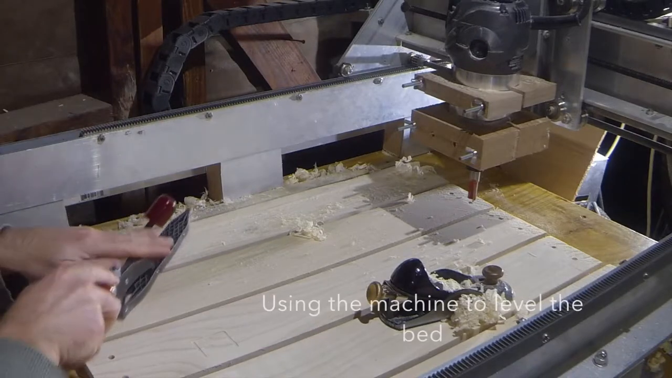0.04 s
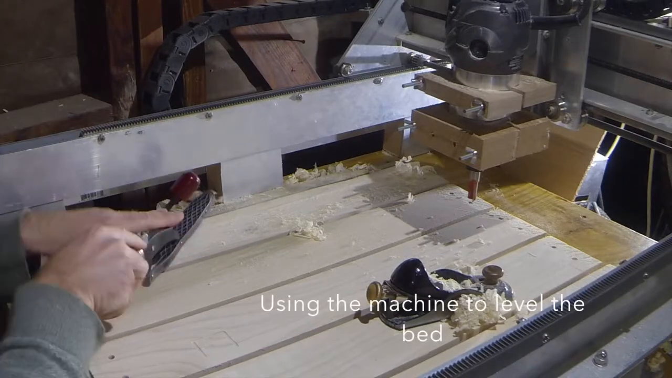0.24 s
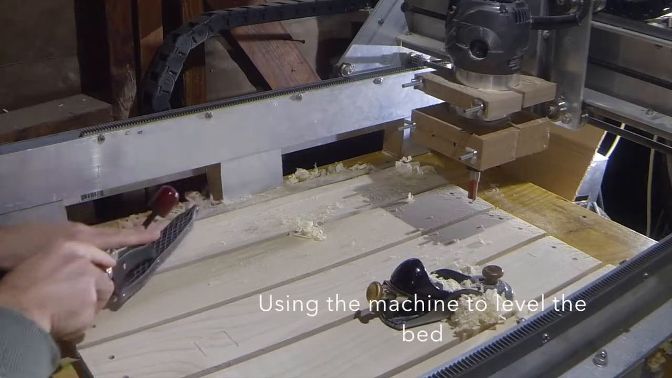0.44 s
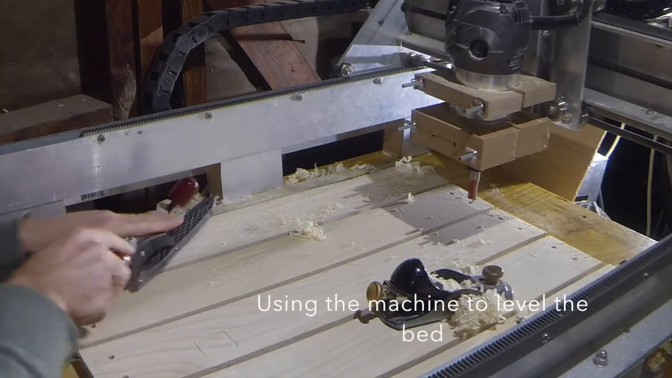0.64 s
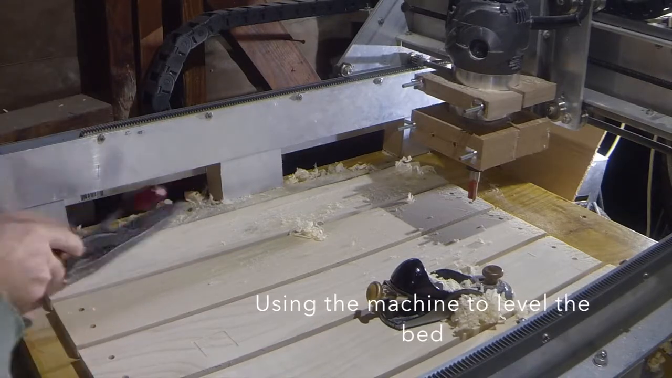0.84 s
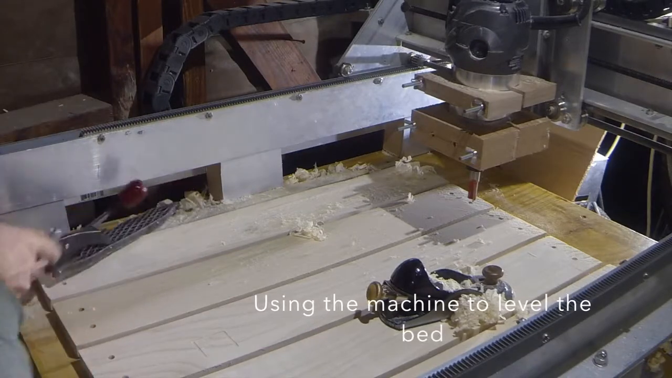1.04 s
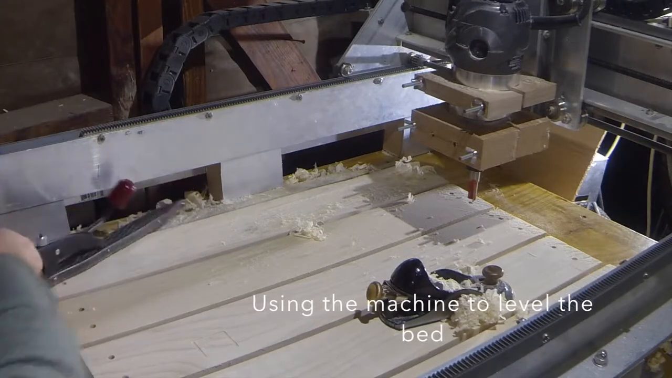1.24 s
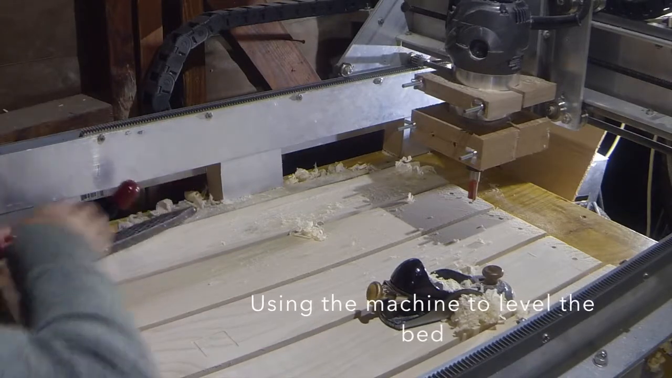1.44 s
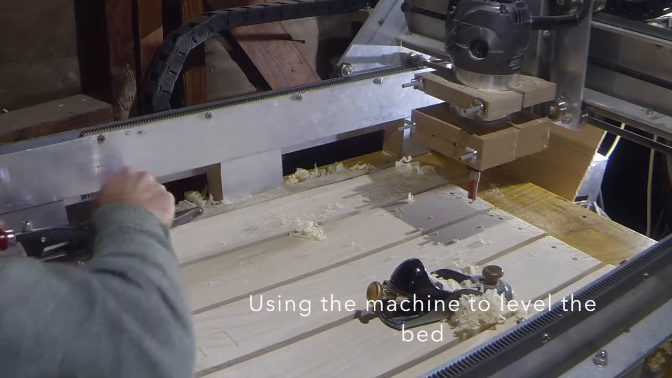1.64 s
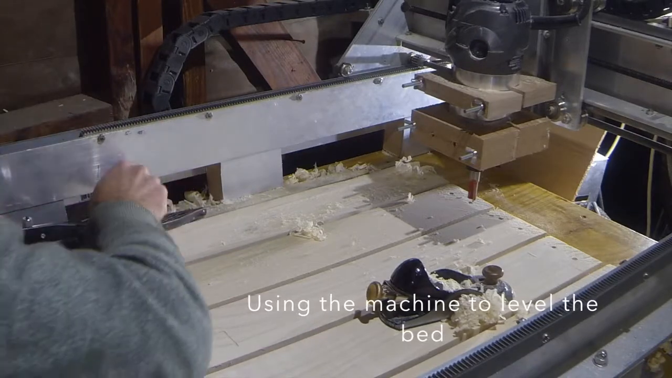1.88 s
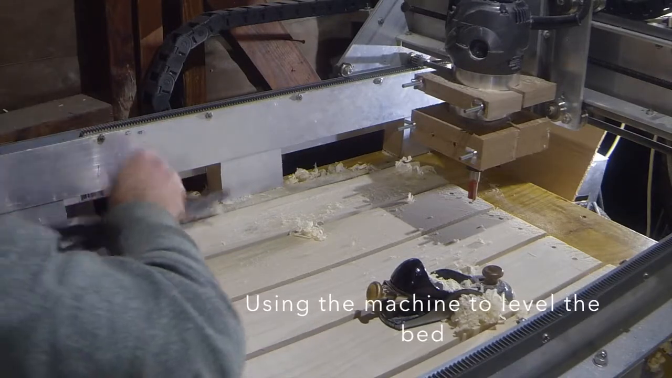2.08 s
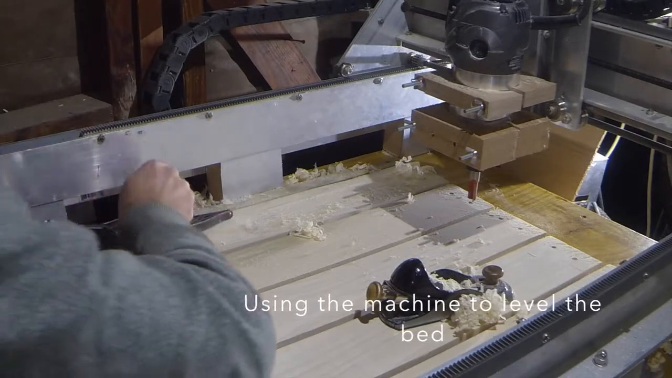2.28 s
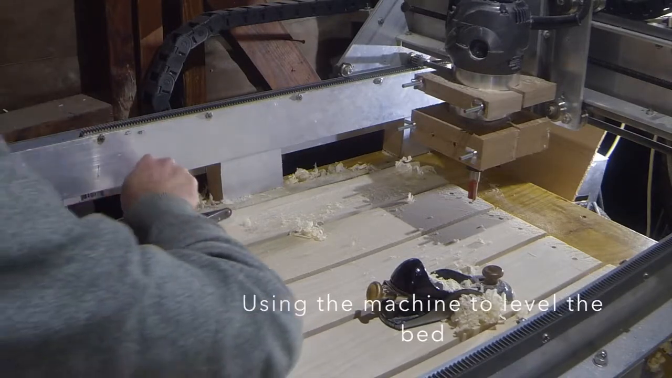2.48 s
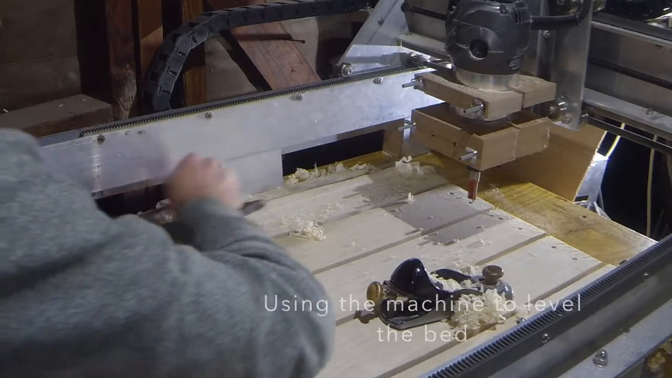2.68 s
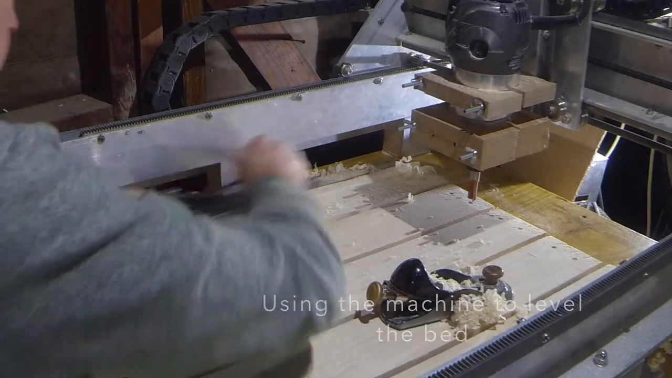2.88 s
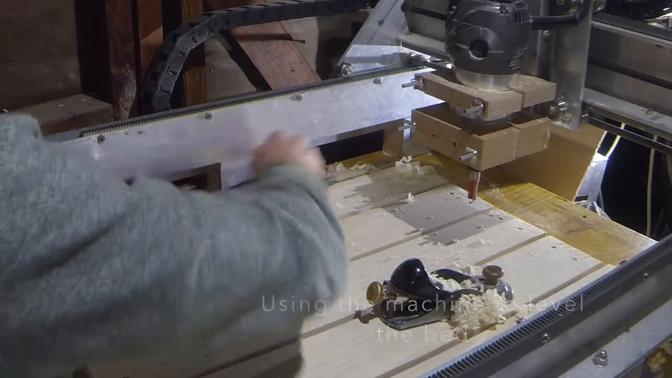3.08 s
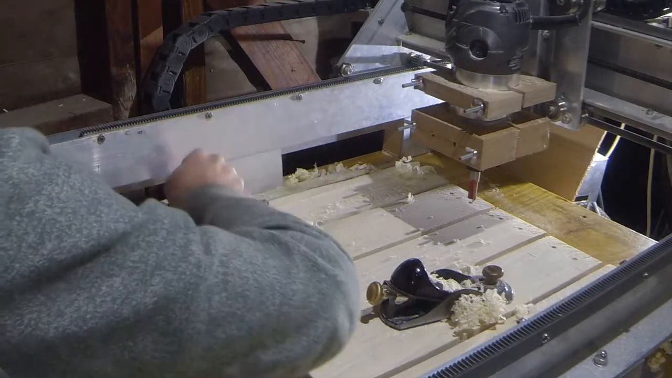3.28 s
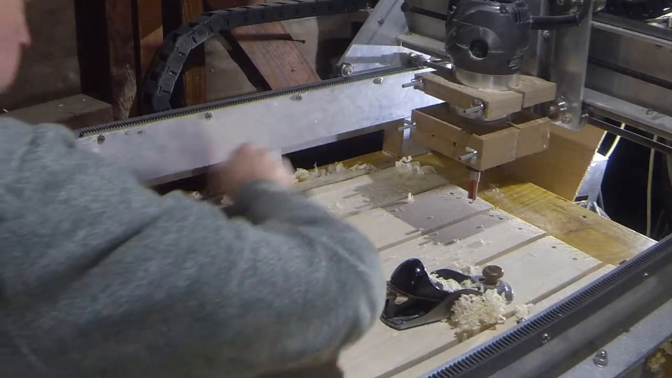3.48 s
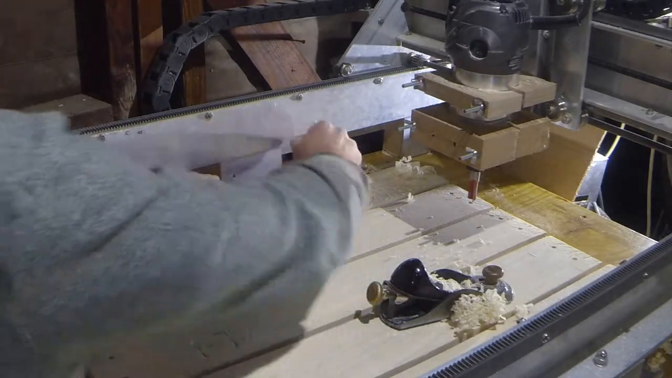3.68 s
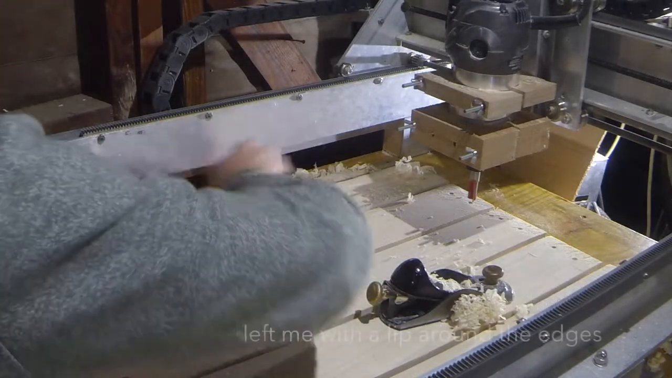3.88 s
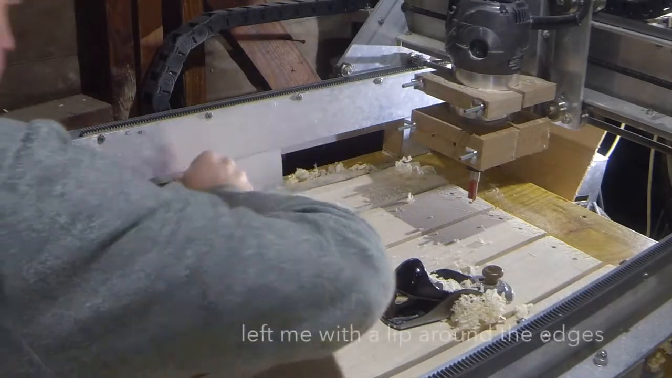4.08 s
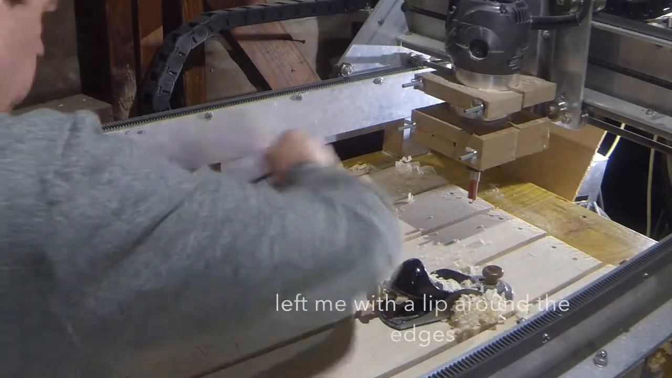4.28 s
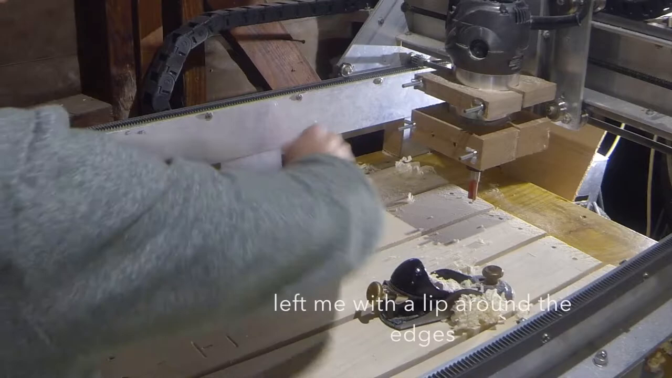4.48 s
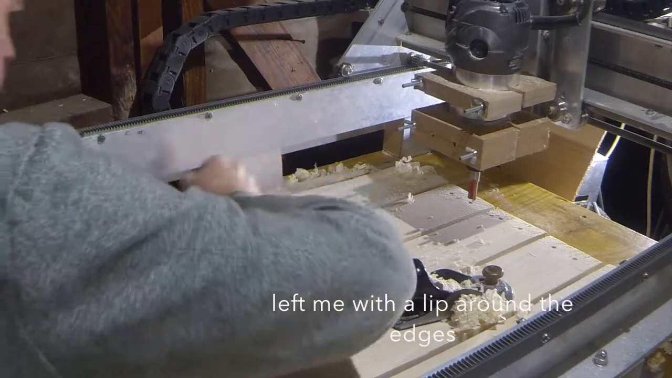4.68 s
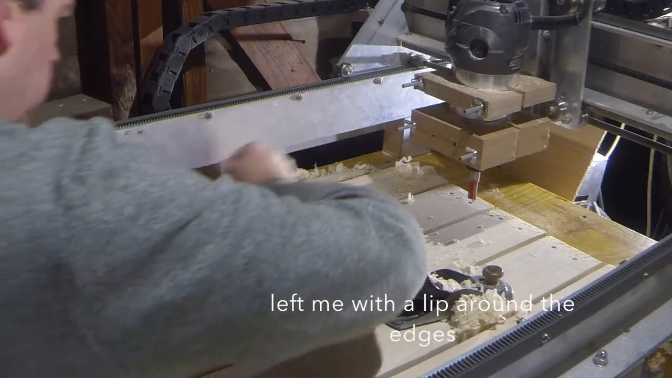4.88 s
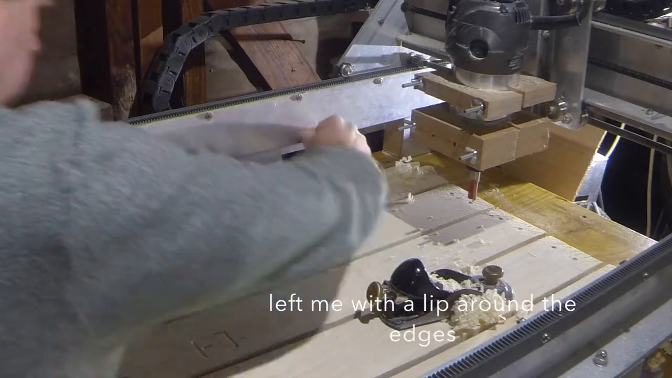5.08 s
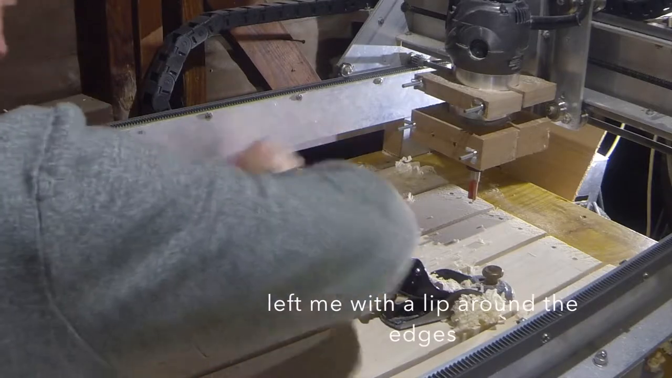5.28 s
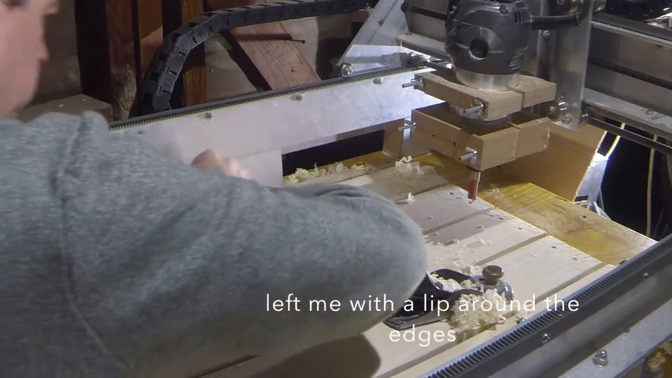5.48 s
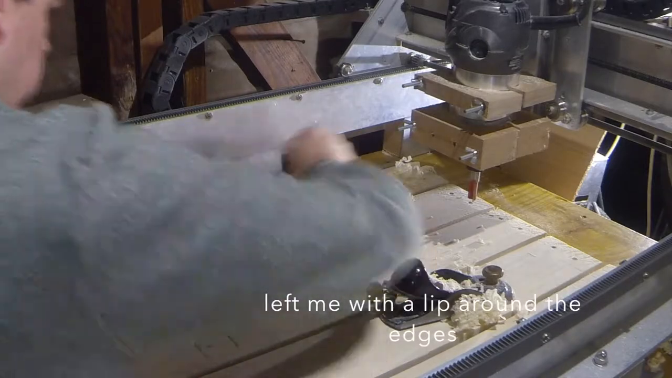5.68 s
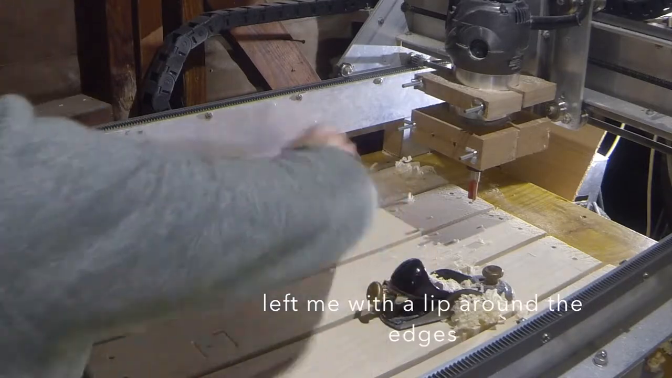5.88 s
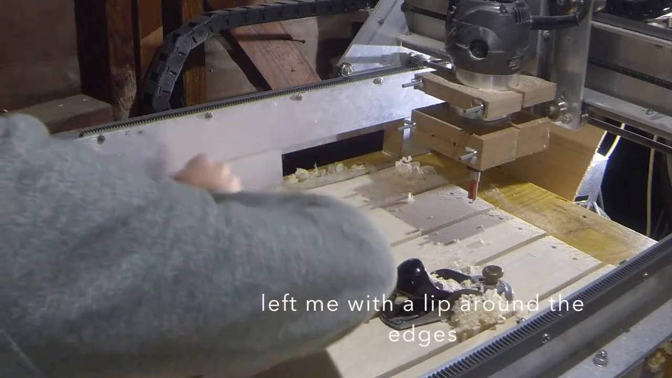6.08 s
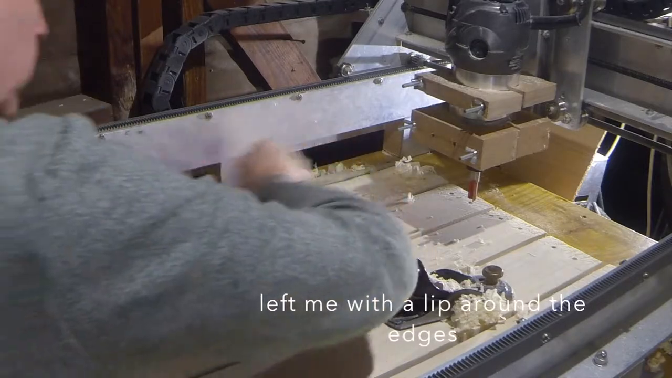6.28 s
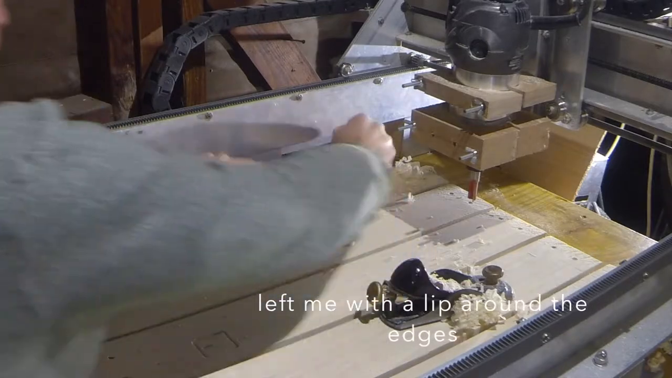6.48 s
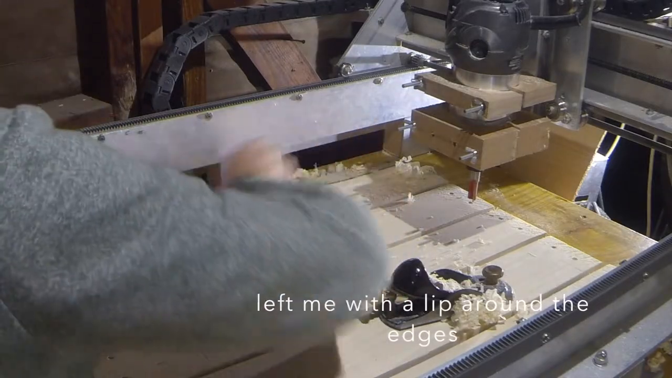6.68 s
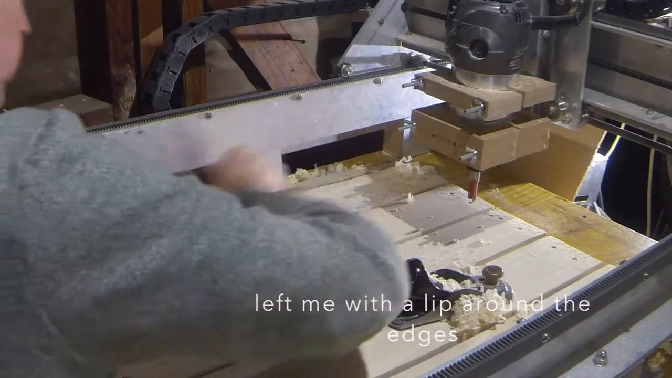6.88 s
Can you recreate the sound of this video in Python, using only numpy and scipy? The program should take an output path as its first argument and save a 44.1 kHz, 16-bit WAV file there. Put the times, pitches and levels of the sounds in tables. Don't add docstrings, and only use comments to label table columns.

```python
import sys
import numpy as np
from scipy import signal
from scipy.fft import rfft, irfft
from scipy.io import wavfile
from scipy.ndimage import uniform_filter1d

SR = 44100
rng = np.random.default_rng(int(sys.argv[2]) if len(sys.argv) > 2 else 0)


def field_ratio(decibels):
    return 10 ** (np.asarray(decibels, dtype=float) / 20)


def master(y):
    cut = np.clip(np.atleast_2d(y).T, -1, 1)
    pcm = np.round(cut * 32767)
    wavfile.write(sys.argv[1], SR, pcm.astype(np.int16))


N = 306054
HZ = np.fft.rfftfreq(N, 1 / SR)


def evened(x):
    return x / np.sqrt(np.mean(x ** 2) + 1e-20)


def read(points, hz):
    f, value = np.transpose(points)
    return np.interp(np.log(hz + 1), np.log(f + 1), value)


def coloured(points):
    spectrum = rfft(rng.standard_normal(N))
    return evened(irfft(spectrum * field_ratio(read(points, HZ)), N))


def smoothed(x, size, axis=-1):
    return uniform_filter1d(uniform_filter1d(x, size=size, axis=axis), size=size, axis=axis)


def ring(modes, sense=-1, rise_cycles=0.011):
    hz, width_hz, db = np.transpose(modes)[:, :, None]
    t = np.arange(SR // 3) / SR
    turn = sense ** np.arange(len(modes))[:, None]
    swing = (1 - np.exp(-hz * t / rise_cycles)) ** 2 * np.exp(-np.pi * width_hz * t)
    tick = (turn * field_ratio(db) * width_hz * swing * np.sin(2 * np.pi * hz * t)).sum(0)
    return tick / np.linalg.norm(tick)


# (frequency [Hz], width [Hz], level [dB])
BED_MODES = [(181, 48, -12), (269, 58, -11.5), (302, 16.4, -0.5), (365.4, 17.3, 1), (431.8, 15.3, -1.5),
             (492.7, 42, -3.5)]
BODY_MODES = [(665, 29.5, -0.07), (709, 56, -0.18), (748, 31, 1.8), (807, 43, -1.6), (923.6, 21.3, 0.71),
              (953, 42, 2), (1035, 52, 1.5), (1137, 52, 0.76), (1235, 37.5, -0.38), (1320, 36, 0.39)]
SOLE_MODES = [(1465, 86, 2), (1601, 98, 0.5), (1712, 23, -2.5), (1749, 47, -5.5), (1927, 34, -7)]
IRON_MODES = [(2114, 126, -0.5), (2497, 210, -5), (2845, 136, -2), (3033, 143, -4), (3286, 37, 0.5),
              (3440, 110, -2), (3737, 460, -6.5), (4346, 152, -6), (4560, 140, -11), (4720, 240, -13),
              (5160, 460, -17), (5750, 220, -18), (6140, 490, -21.5), (7300, 560, -23), (7370, 63, -18.5),
              (8000, 490, -30), (8560, 210, -24.5), (9100, 590, -28.5), (10260, 2900, -37),
              (12700, 1500, -57)]
HEEL_MODES = [(596, 150, -1), (827, 50, 2), (894, 147, -2)]


def strokes():
    edge_db = -15
    body, bed, iron = catches()
    torn = fibres()
    caught = [body, bed, field_ratio(-8.5) * body, iron, field_ratio(-13) * bed]
    forces = (rubbing() + caught) * torn
    objects = (BODY_MODES, BED_MODES, SOLE_MODES, IRON_MODES, HEEL_MODES)
    parts = [signal.oaconvolve(force, ring(modes))[:N] for force, modes in zip(forces, objects)]
    sharp = np.diff(ring(IRON_MODES), n=2)
    sharp = sharp / np.linalg.norm(sharp)
    return sum(parts) + signal.oaconvolve(field_ratio(edge_db) * iron * torn, sharp)[:N]


def fibres():
    fibres_per_s, spread_db = 6000, 2.5
    grip_db, chatter_db, patch_db = 1.9 - 1.3, 0.8, 1.9
    size = field_ratio(spread_db * np.minimum(rng.exponential(1, N), 5)) * rng.choice([-1., 1.], N)
    ticks = size * (rng.random(N) < fibres_per_s / SR)
    grip = evened(smoothed(rng.standard_normal(N), 900))
    chatter = evened(smoothed(rng.standard_normal(N), 150))
    ticks = ticks * field_ratio(grip_db * grip + chatter_db * chatter)
    z = signal.stft(ticks, nperseg=1024, noverlap=768)[2]
    patches = smoothed(smoothed(rng.standard_normal(z.shape), 5, axis=0), 12, axis=1)
    z = z * field_ratio(patch_db * evened(patches))
    return evened(signal.istft(z, nperseg=1024, noverlap=768)[1][:N])


# (start [s], length [s], body at full speed [dB], share of way to full speed [0-1],
# bed above body [dB])
PUSHES = [
    (2.47, 0.53, -37.5, 0.76, -5.5),
    (3.27, 0.43, -34.5, 0.54, -6.5),
    (3.986, .414, -33.5, 0.52, -5.5),
    (4.672, 0.43, -33.5, 0.5, -5.5),
    (5.384, 0.4, -33, 0.46, -4.5),
    (6.066, .43, -31.5, 0.52, -4),
    (6.742, 0.35, -33, 0.33, -2),
]
PULLS = [
    (2.949, 0.35, -43.5, 0.35, -2.5),
    (3.652, 0.35, -41.5, 0.35, -5),
    (4.362, 0.35, -43.5, 0.29, 2.5),
    (5.058, 0.36, -42, 0.34, -2.5),
    (5.748, .36, -43, 0.36, 2),
    (6.445, 0.34, -38.5, 0.37, -5.5),
]
# (start [s], length [s], body [dB], bed above body [dB],
# brightness [dB])
TRIMS = [
    (-.015, 0.28, -43, 2, 3),
    (.228, 0.24, -44, 3, -1),
    (.452, 0.19, -39, -1, 1),
    (.625, 0.23, -50.5, 7, 0.8),
    (2.435, 0.26, -55, 1.5, 0.5),
]
SHIFTS = [(.83, .11, -60, 1.5, -7), (1.03, .07, -71, -2, 1.5), (1.16, .12, -66, -4, 0),
          (1.232, .11, -64, 6, -3), (1.322, .15, -58.5, 0, -1.5), (1.46, .08, -70, 6, -3),
          (1.59, .16, -67, 0, 1), (1.7, .1, -71, 5, -3), (1.85, .12, -64, -3, 5), (1.97, .06, -72, 3, -3),
          (2.347, .06, -68, 3, -5)]
# (bite [s], lift [s], start below full speed [dB], end below full speed [dB])
PUSH_MOTION = (0.07, 0.16, -19.5, -5)
PULL_MOTION = (0.04, 0.1068, -12.5, -15)
TRIM_MOTION = (0.03, 0.1268, -7, -13)
SHIFT_MOTION = (.012, .045, -5, -8)
# (sole, iron, heel above body [dB]; bed, sole, iron gain from start to end [dB])
PUSH_MIX = (-6, -6.5, -14.5, 3, 3, 6)
PULL_MIX = (-4, -4.5, -8.5, 8.5, 6.5, 1.5)
TRIM_MIX = (-2, -4, -2, 6, 3, -0.5)
SHIFT_MIX = (1.5, -4, -4, 0, 2, 0)
SPEED_EXPONENTS = (0.66, 1.16, 1.21, 0.4)


def rubbing():
    trim_top, shift_top = 0.57, 0.35
    t, gains = np.arange(N) / SR, np.zeros((5, N))
    exponents = np.array([1, *SPEED_EXPONENTS])[:, None]
    pushes, pulls = [[(*row, 0) for row in rows] for rows in (PUSHES, PULLS)]
    trims = [(*row[:3], trim_top, *row[3:]) for row in TRIMS]
    shifts = [(*row[:3], shift_top, *row[3:]) for row in SHIFTS]
    kinds = [(pushes, PUSH_MOTION, PUSH_MIX), (pulls, PULL_MOTION, PULL_MIX),
             (trims, TRIM_MOTION, TRIM_MIX), (shifts, SHIFT_MOTION, SHIFT_MIX)]
    for rows, (bite_s, lift_s, start_db, end_db), (sole_db, iron_db, heel_db, *lean_db) in kinds:
        for start, length, db, top, bed_db, bright_db in rows:
            on = (t > start) & (t < start + length)
            way = (t[on] - start) / length
            top = np.clip(top, .05, .95)
            gathering_db = start_db * (1 - way / top) ** 2
            slowing_db = end_db * ((way - top) / (1 - top)) ** 2
            slow_db = np.where(way < top, gathering_db, slowing_db)
            bite = np.minimum(way * length / bite_s, 1)
            lift = np.minimum((1 - way) * length / lift_s, 1)
            speed = ((bite * lift) ** 2 * field_ratio(slow_db)) ** exponents
            share_db = np.array([0, bed_db, sole_db + bright_db, iron_db + bright_db, heel_db])
            lean = np.outer([0, *lean_db, 0], way - .5)
            gains[:, on] += field_ratio(db + share_db[:, None] + lean) * speed
    return gains


# (time [s], body [dB], bed [dB], iron [dB], length [ms])
CATCHES = [(0.253, -37.5, -54, -73, 5.5), (.472, -68, -48, -69, 7.9), (0.76, -49, -30, -43.5, 8),
           (.774, -50, -48, -41, 5.9), (0.793, -41, -48, -38, 7.9), (.817, -43.5, -40, -46, 6.4),
           (0.974, -58, -54, -60, 5.5), (1.235, -63, -45, -70, 8.9), (1.325, -63.5, -58, -64.5, 21),
           (1.458, -77, -53, -66, 8.5), (1.599, -63.5, -70, -63, 7.1), (1.858, -72, -76, -73, 6.9),
           (2.045, -42, -46, -52, 8.6), (2.088, -38, -27, -54, 26), (3.309, -57, -57, -65, 10),
           (3.682, -41, -31.5, -67, 7.1), (4.397, -47, -46, -77, 19), (4.435, -32, -34, -65, 7),
           (4.702, -48, -46, -53, 39), (5.412, -63, -52, -58, 28), (5.78, -56, -50, -80, 7.4),
           (6.097, -63, -69, -59, 4.5), (6.482, -35, -37, -70, 9.8), (6.769, -55, -59, -50, 8.1)]


def catches():
    gains, t = np.zeros((3, N + SR)), np.arange(SR // 4) / SR
    for s, *levels_db, ms in CATCHES:
        at = round(s * SR)
        fade = np.exp(-1000 * t / ms) * np.minimum(t * 700, 1)
        gains[:, at:at + len(t)] += field_ratio(np.array(levels_db))[:, None] * fade
    return gains[:, :N]


# (time [s], level [dB])
LOW_SWELLS = [(.01, -50), (.13, -53), (.28, -49), (.58, -54), (1.63, -57.5), (2.53, -55), (2.6, -53),
              (2.7, -53), (2.95, -54), (3.19, -53), (3.77, -47), (4.39, -48), (4.52, -54), (4.97, -54),
              (5.06, -53), (5.16, -52), (5.299, -58), (5.47, -54.5), (5.7, -40), (5.84, -52), (6.29, -53),
              (6.41, -48), (6.5, -40), (6.6, -55), (6.85, -68)]
HIGH_SWELLS = [(.01, -46.5), (.12, -53), (.36, -32.5), (.58, -42), (.76, -59), (1.27, -52.5), (1.35, -56),
               (2.58, -57), (2.87, -53), (3.45, -40), (3.59, -47.5), (4.2, -50), (4.47, -60), (4.61, -53),
               (4.81, -40.5), (5.53, -42), (5.83, -61), (6.2, -49), (6.3, -57), (6.85, -46)]


def hums():
    board_hz, wander_hz = (173.4, 265.8), 4.84
    hum_db = (-20.5, -15.5)
    swell_half_width_s = (0.033, 0.039)
    wander = evened(smoothed(rng.standard_normal((2, N)), 900, axis=1))
    hz = np.array(board_hz)[:, None] + wander_hz * wander
    t = np.arange(N) / SR
    gains = np.outer(field_ratio(np.array(hum_db)), rubbing()[1])
    for gain, rows, width_s in zip(gains, (LOW_SWELLS, HIGH_SWELLS), swell_half_width_s):
        gain += sum(field_ratio(db) / (1 + ((t - s) / width_s) ** 2) ** 2 for s, db in rows)
    phase = 2 * np.pi * np.cumsum(hz, axis=1) / SR
    return (np.sqrt(2) * gains * np.sin(phase)).sum(0)


# (time [s], body [dB], bed [dB], iron [dB])
SET_DOWN = [
    (2.0432, -38, -24.5, -40),
    (2.0452, -32, -26.5, -50),
    (2.089, -9.5, -27, -34),
    (2.0986, -24, -20.5, -46),
]
# (frequency [Hz], width [Hz], level [dB])
STRUCK_BODY = [(570, 140, 1), (689, 166, 4), (960, 82, -0.5), (990, 330, -4), (1049, 71, 2.5),
               (1124, 81, 0.5), (1320, 95, -5), (1502, 62, 3), (1530, 34, -3), (2120, 140, -7.5)]
STRUCK_BED = [(163, 8.3, -0.5), (198, 22, -1), (258, 14, 11), (296.6, 14, 10), (359, 6.8, 3), (424, 28, 2),
              (521, 36, 2)]
STRUCK_IRON = [(2130, 35, -2), (2540, 60, -6), (2820, 52, 3), (3150, 53, 2), (3220, 52, 2), (3440, 79, 5),
               (4200, 130, -4), (4800, 200, -18), (5400, 300, -21)]


def knocks():
    out = np.zeros(N)
    objects = [(STRUCK_BODY, .9), (STRUCK_BED, .3), (STRUCK_IRON, .8)]
    rings = [ring(modes, sense=0.85, rise_cycles=rise) for modes, rise in objects]
    for s, *levels_db in SET_DOWN:
        at = round(s * SR)
        blow = sum(field_ratio(db) * x / abs(x).max() for x, db in zip(rings, levels_db))
        out[at:at + len(blow)] += blow
    return out


# (frequency [Hz], t60 [s])
SHOP_T60 = [(150, 0.19), (400, 0.33), (1000, 0.29), (3000, 0.37), (8000, 0.098)]


def shop(x):
    taps = np.zeros(SR // 2)
    at = np.arange(300, SR // 2 - 20, 20)
    taps[at + rng.integers(0, 20, len(at))] = rng.choice([-1., 1.], len(at))
    hz, t, z = signal.stft(taps, SR, nperseg=256)
    decay = field_ratio(-60 * t / read(SHOP_T60, hz)[:, None])
    tail = signal.istft(z * decay, SR, nperseg=256)[1]
    return signal.fftconvolve(x, tail / np.linalg.norm(tail))[:N]


# (time [s], level [dB])
RUMBLE = [(0.0, -57), (0.13, -51), (0.42, -49), (0.6, -40.5), (0.91, -53.5), (2.01, -54), (2.05, -40.5),
          (2.43, -53), (2.51, -43), (2.76, -55), (3.01, -46.5), (3.3, -55.5), (3.69, -39.5), (3.84, -52),
          (4.48, -41.5), (4.52, -49.5), (6.63, -49), (6.94, -50)]
# (frequency [Hz], level [dB per Hz])
RUMBLE_COLOUR = [(7.1, -27), (12, 5), (38, 0.5), (75, -3), (113, -28), (134, -24), (150, -12.5),
                 (200, -24.5), (330, -120)]


def rumble():
    s, db = np.transpose(RUMBLE)
    return field_ratio(np.interp(np.arange(N) / SR, s, db)) * coloured(RUMBLE_COLOUR)


# (frequency [Hz], level [dB per Hz])
AIR_COLOUR = [(35, -38), (60, -2), (162, -9), (263, -12.5), (501, -26), (646, -26.5), (912, -30),
              (2240, -35.5), (3100, -34), (7800, -42.5), (9370, -42), (12400, -49), (15500, -49)]


def air():
    return field_ratio(-60) * coloured(AIR_COLOUR)


def scene():
    shop_db = -16.5
    work = strokes() + hums() + knocks()
    return (work + field_ratio(shop_db) * shop(work) + rumble() + air())[None]


def thinned(x):
    sparse_hz, keep_db, follow = 12800, 7.5, .5
    window = signal.windows.cosine(1280)
    hz, _, z = signal.stft(x, SR, window, nperseg=1280, noverlap=640)
    just_below = (hz > sparse_hz - 800) & (hz < sparse_hz)
    below = np.median(abs(z[just_below]), axis=0) + 1e-12
    quiet = np.percentile(below, 20)
    bar = field_ratio(keep_db) * quiet * (below / quiet) ** follow
    z = z * ((hz[:, None] < sparse_hz) | (abs(z) > bar))
    return signal.istft(z, SR, window, nperseg=1280, noverlap=640)[1][:N]


def low_pass(x):
    return signal.sosfilt(signal.butter(12, 15020, fs=SR, output="sos"), x)


def record(dry):
    mix = thinned(dry[0])[None]
    return low_pass(mix)


dry = scene()
out = record(dry)
master(out)
```